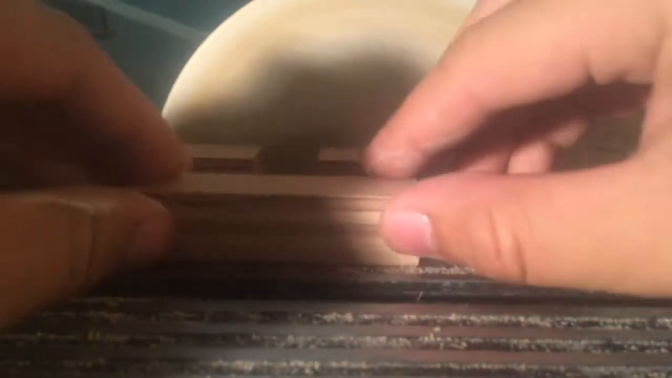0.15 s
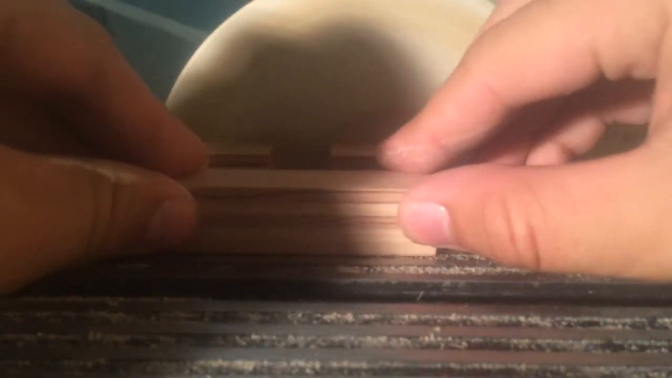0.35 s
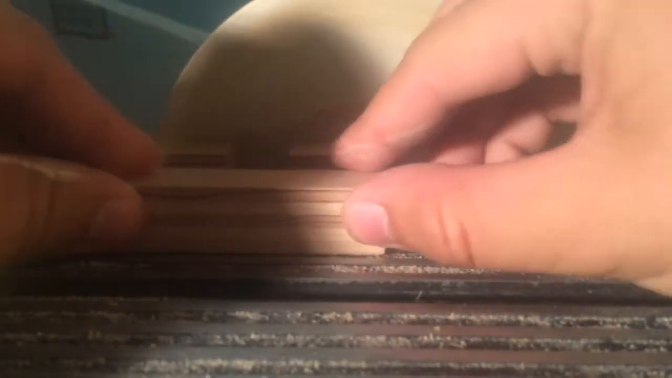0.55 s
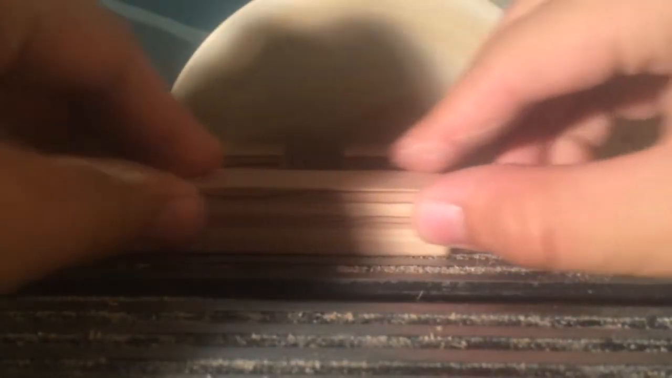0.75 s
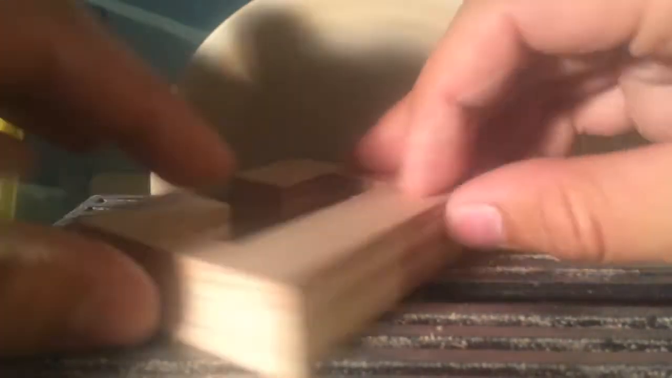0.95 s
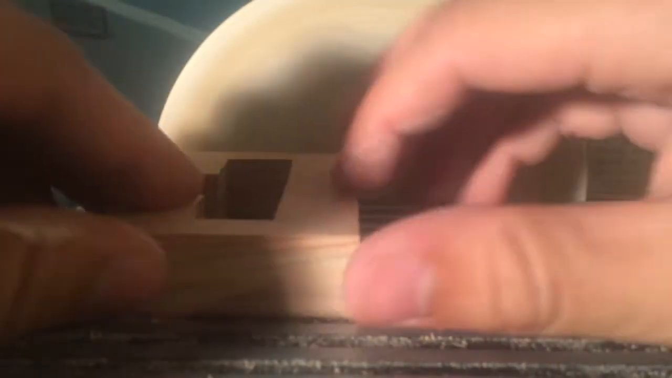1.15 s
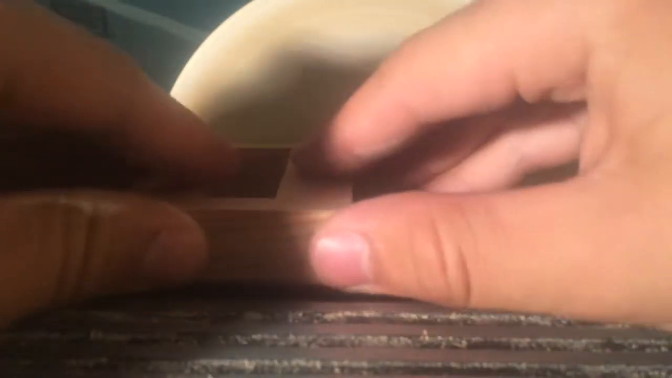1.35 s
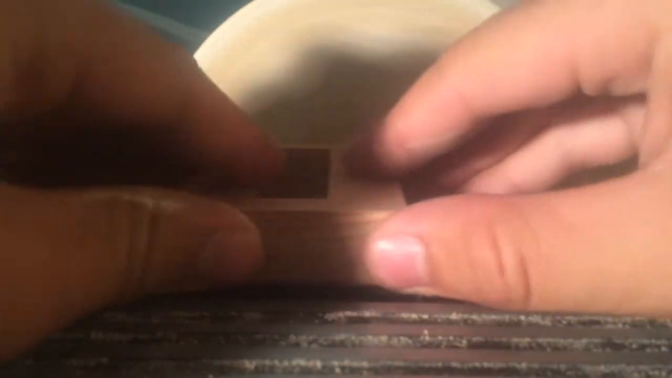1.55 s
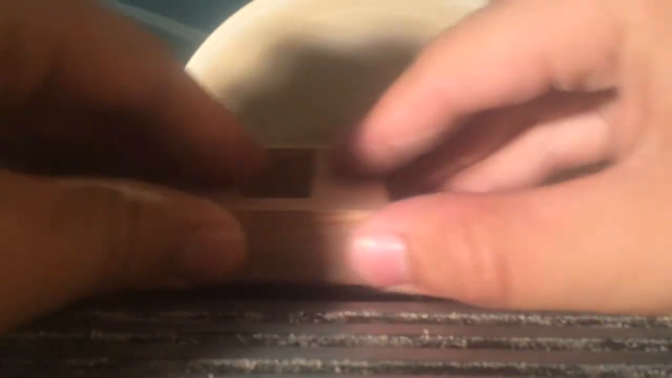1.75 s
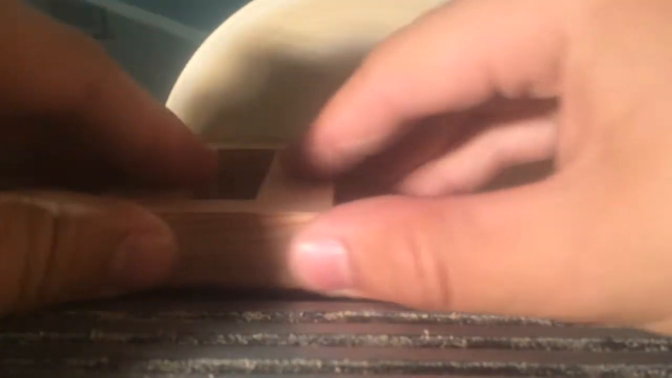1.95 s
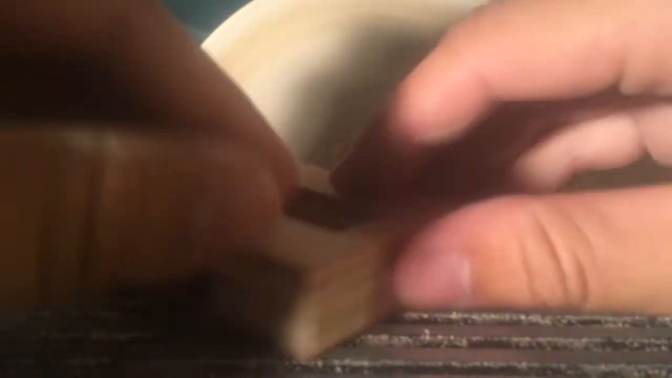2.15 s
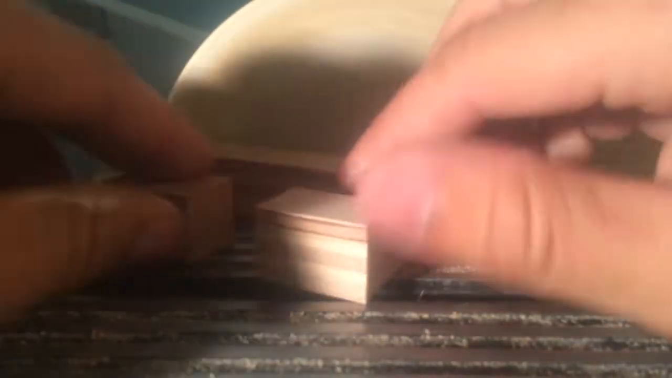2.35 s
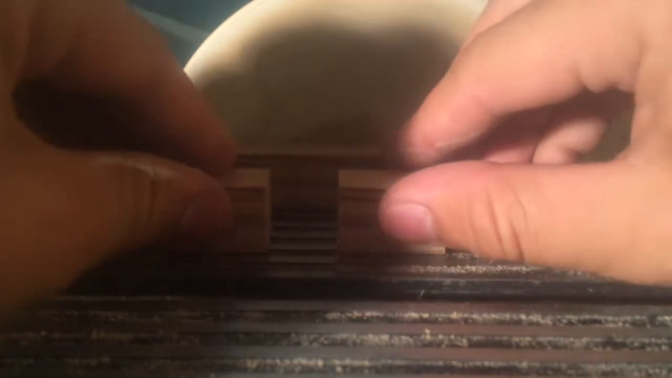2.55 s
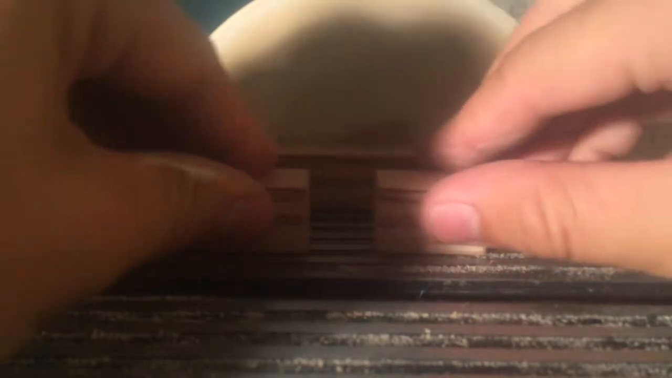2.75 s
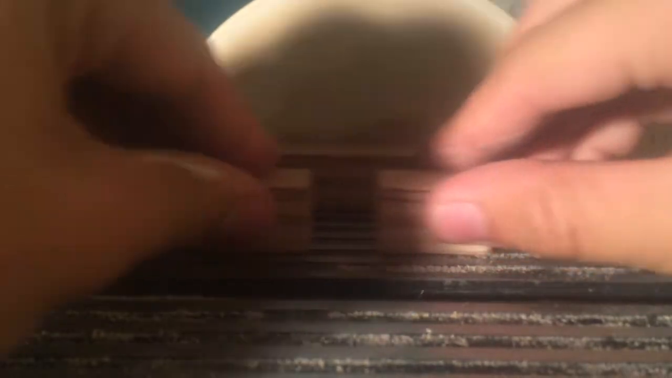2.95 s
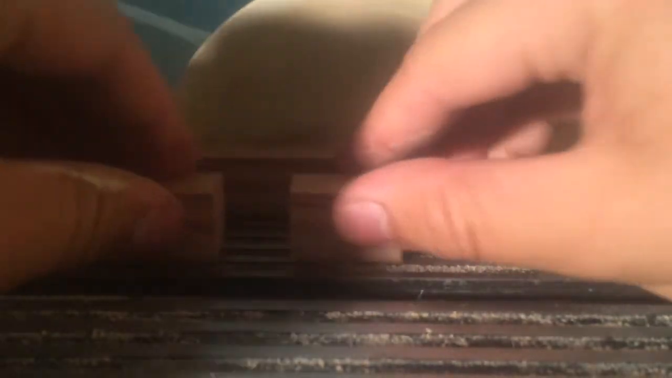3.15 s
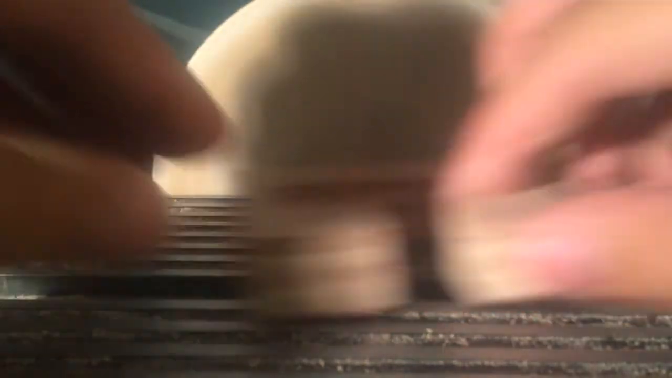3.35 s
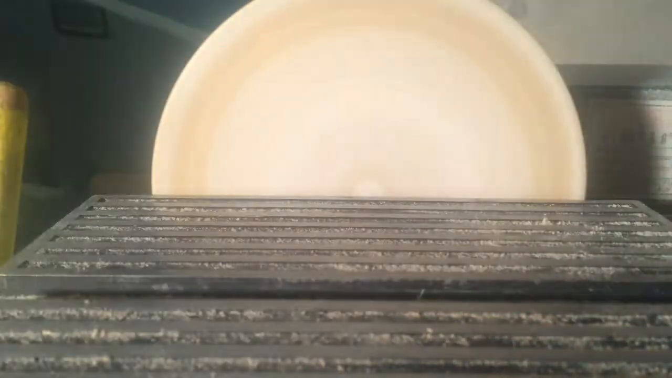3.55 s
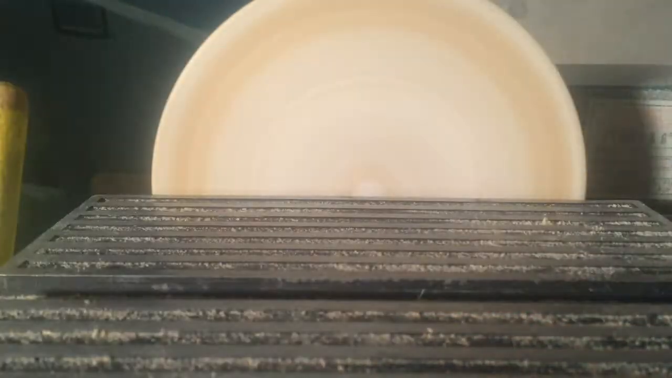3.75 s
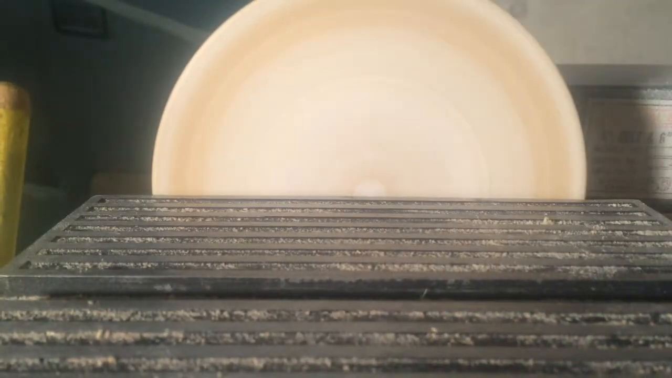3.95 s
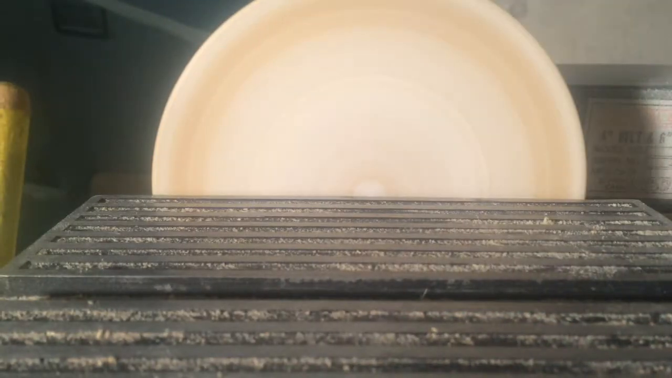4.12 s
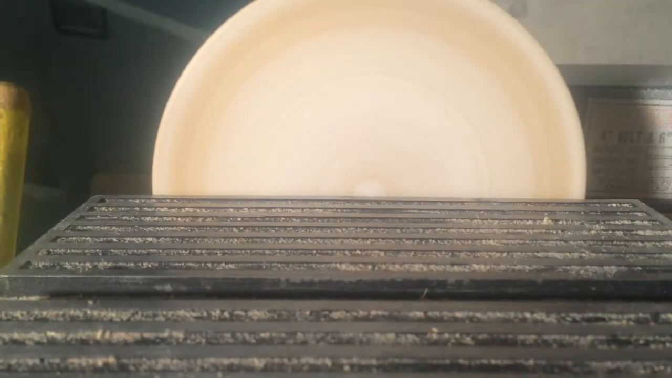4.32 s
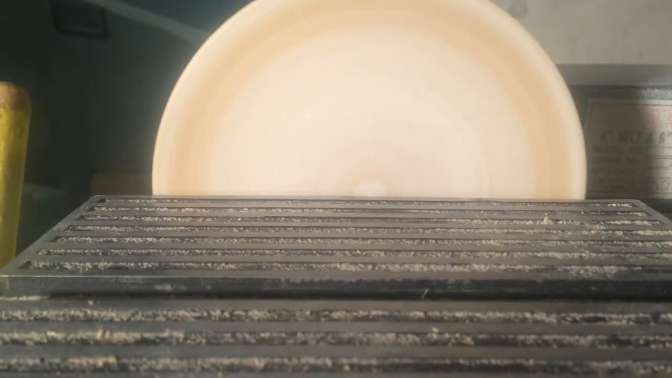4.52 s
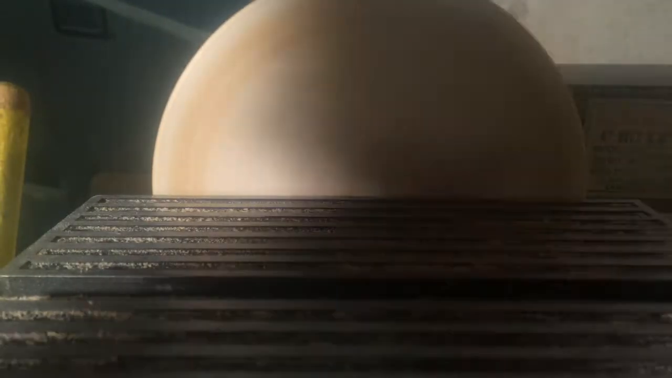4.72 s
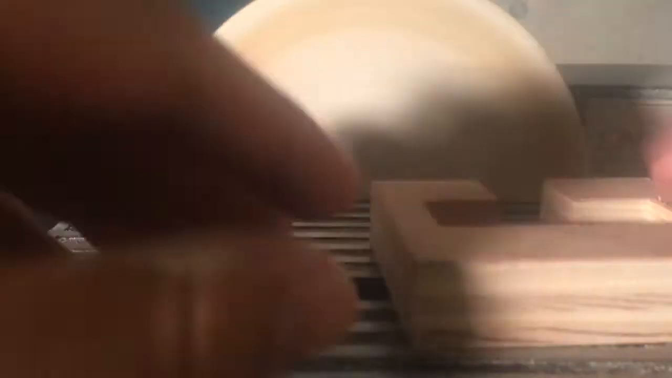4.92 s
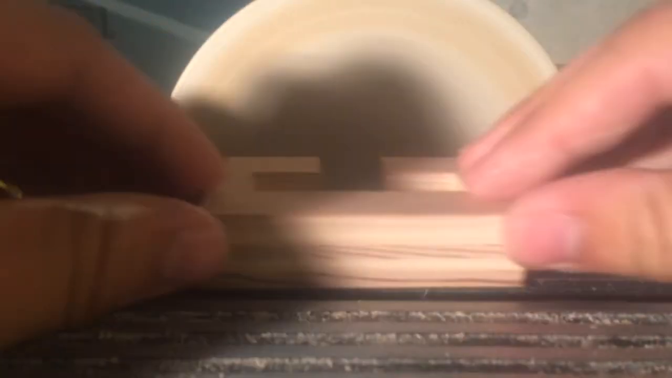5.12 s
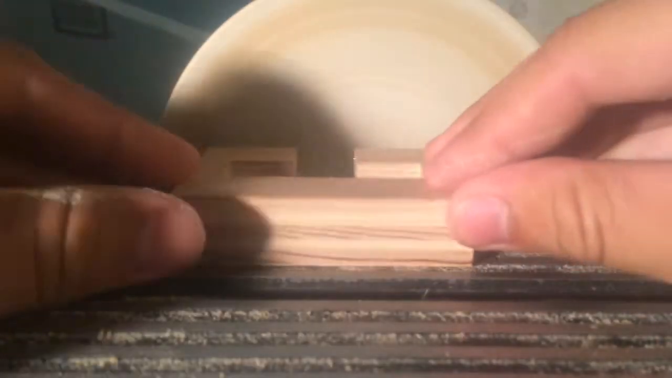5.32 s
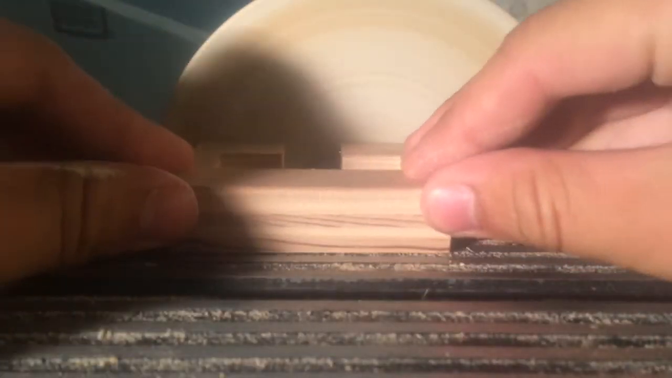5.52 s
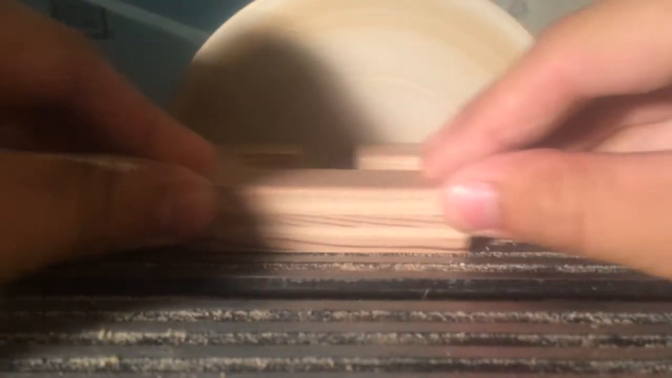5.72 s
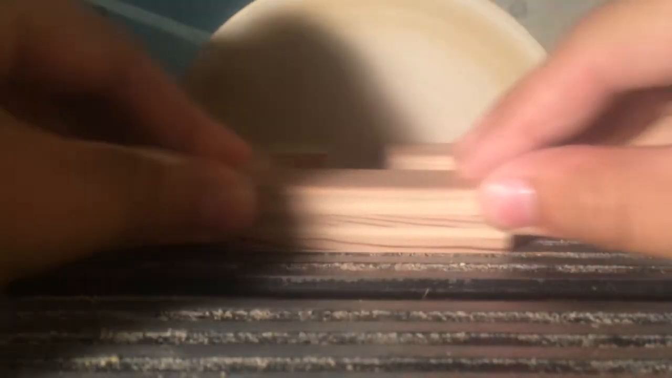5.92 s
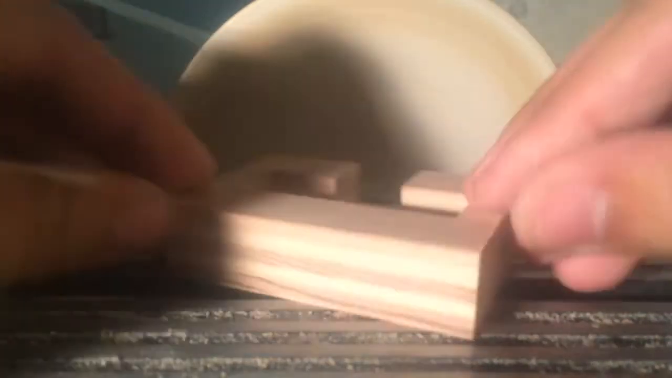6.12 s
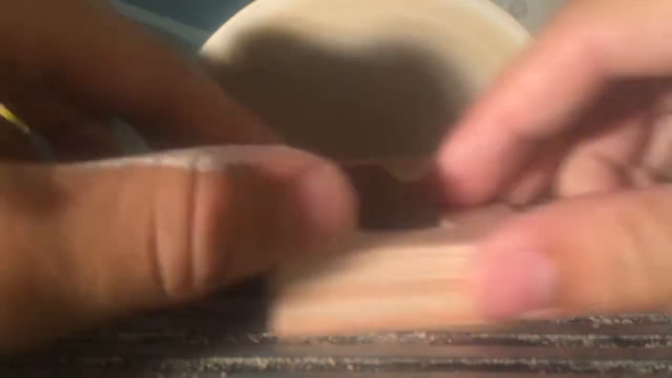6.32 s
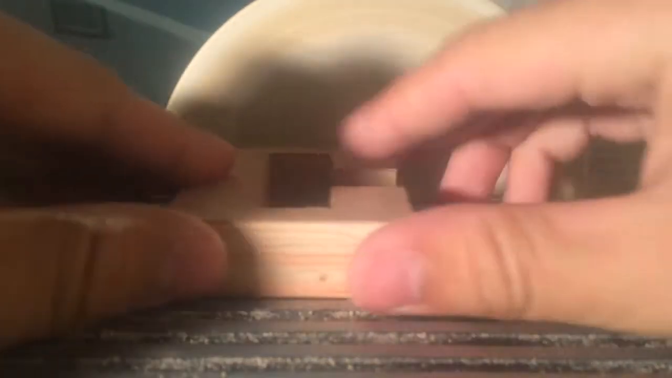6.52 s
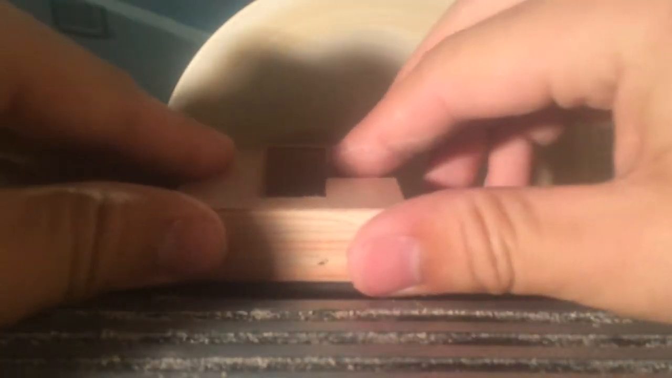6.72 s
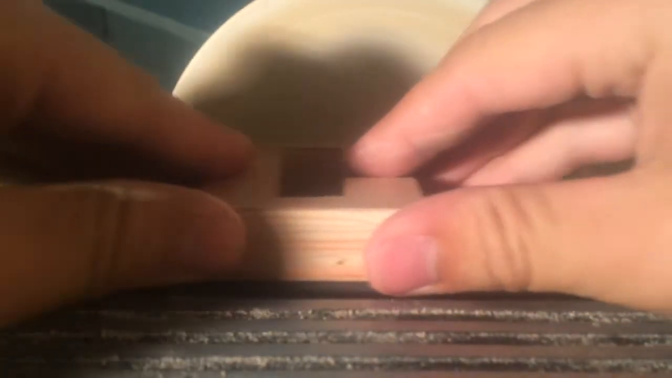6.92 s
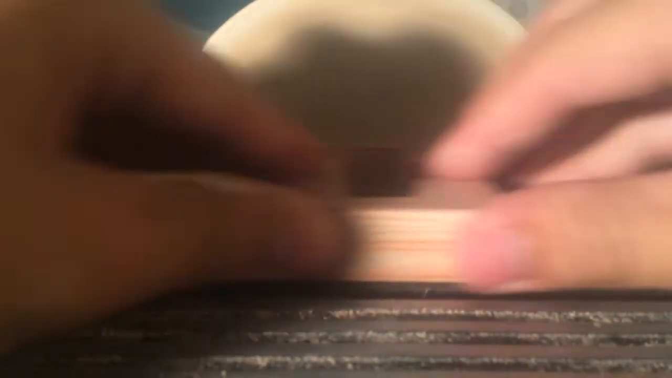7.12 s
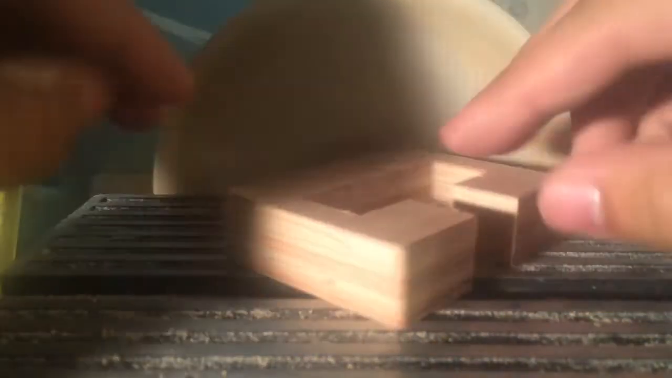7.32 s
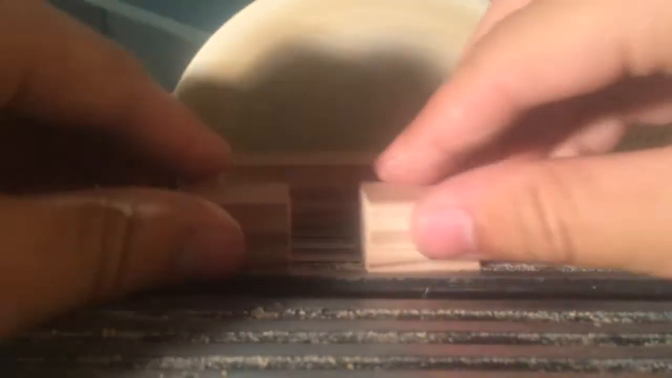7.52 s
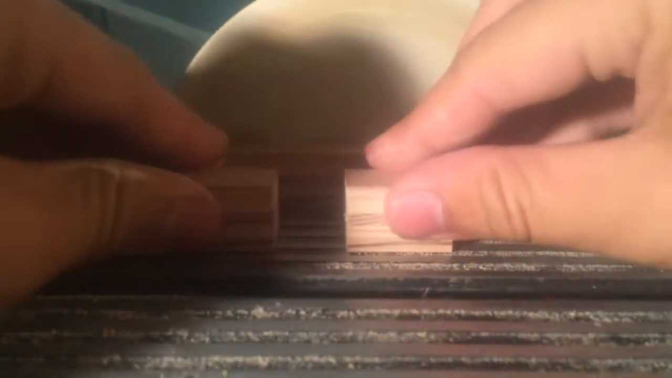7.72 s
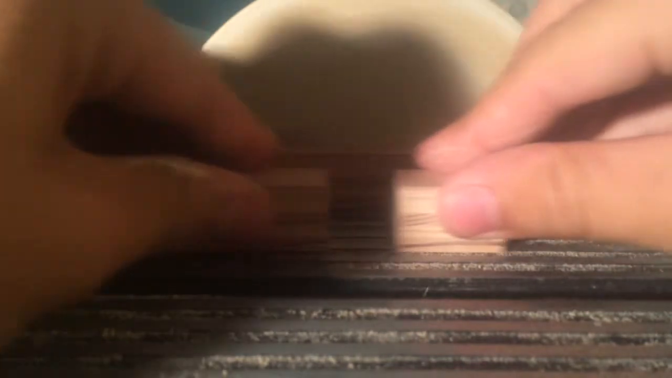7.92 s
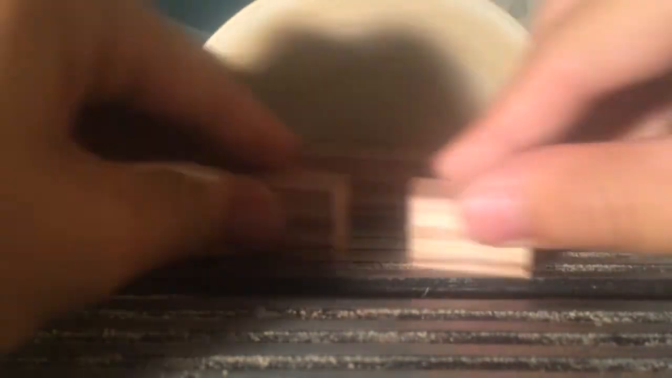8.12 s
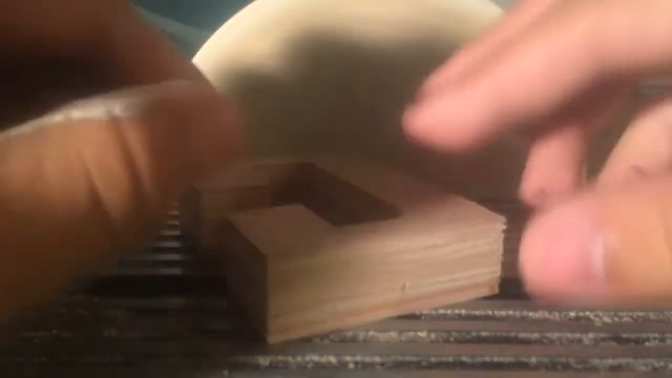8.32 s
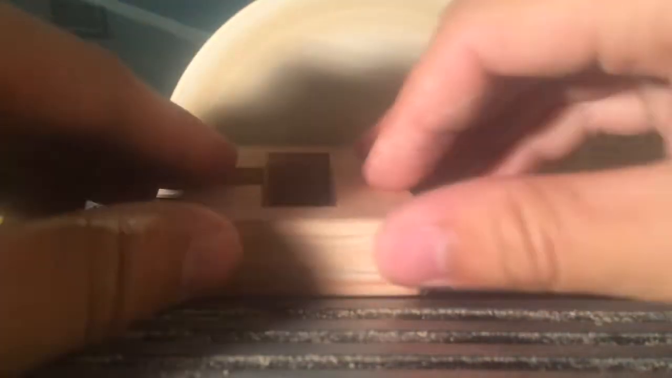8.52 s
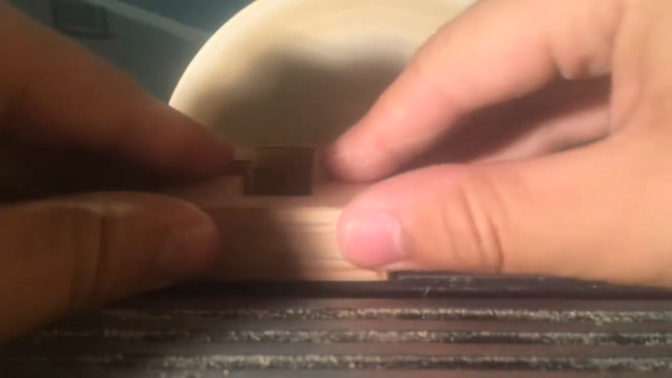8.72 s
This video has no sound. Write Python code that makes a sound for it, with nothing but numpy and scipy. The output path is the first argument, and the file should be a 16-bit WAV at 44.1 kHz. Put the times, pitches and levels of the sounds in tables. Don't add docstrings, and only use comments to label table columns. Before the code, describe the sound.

A disc sander whirs and hisses steadily while a small wooden block is pressed to it in short raspy strokes, with loose ticking and wood knocks.

```python
import sys
import numpy as np
from scipy import signal
from scipy.fft import rfft, irfft, next_fast_len
from scipy.io import wavfile
from scipy.ndimage import uniform_filter1d, minimum_filter1d

SR = 44100
rng = np.random.default_rng(int(sys.argv[2]) if len(sys.argv) > 2 else 0)


def rack_gain(trim_db):
    fader = np.asarray(trim_db, float)
    return 10 ** (fader / 20)


def inscribe(sig):
    pcm = np.round(np.clip(np.atleast_2d(sig).T, -1, 1) * 32767)
    wavfile.write(sys.argv[1], SR, pcm.astype(np.int16))


N = 386316
T = np.arange(N) / SR

CHANGE_S, FADE_OUT_S, FADE_IN_S = 3.882, .018, .035

HUM_HZ = [119, 177.4, 240, 300, 480, 538.5, 660.5, 720, 858, 901]
HUM_DB = [-81, -73, -58.5, -76, -69, -68.5, -69, -84, -76.5, -75]
# spectrum (frequency [Hz], density [dB per Hz]),
# housing rings (frequency [Hz], width [Hz], level [dB]), whole level [dB]
CLEAR_WHIR = [(24, -104), (40, -39), (239, -14.5), (397, -16), (1310, -13), (1590, -22.5), (1900, -16),
              (2650, -12), (4110, -13.5), (4800, -14.5), (5860, -5.5), (7800, -4), (10100, -41),
              (17200, -120)], [(1098, 12, -4), (1300, 100, -7), (1346, 20, -6), (1900, 210, -7.5),
              (2290, 32, -5.5), (2850, 37, -10), (3030, 130, -12.5), (3666, 46, -6), (4090, 115, -1.5),
              (5510, 78, -7.5), (5820, 320, -4), (6630, 42, 0), (7475, 72, 1), (8040, 51, -17)], -42
COVERED_WHIR = [(24, -76), (40, -46), (239, -11), (291, -15), (540, -10), (786, -18.5), (1340, -3),
                (1560, -11), (1860, -4.5), (3370, -7.5), (4020, -13), (7800, -6), (10100, -47),
                (17200, -120)], [(1092, 28, 5.5), (1348, 45, -1), (1906, 140, -1), (2770, 40, -5.5),
                (2986, 34, -7.5), (3660, 45, -2.5), (4085, 130, -2), (5450, 16, -0.5), (5950, 350, -5.5),
                (6580, 102, -1.5), (7630, 56, 1), (7770, 52, -2.5), (8300, 41, -20)], -42
# (time [s], covered share [0-1])
HANDS = [(0, 0.4), (1, 0.9), (2.4, 0.2), (3.25, 0.3), (3.6, 0.08), (4.7, 0), (5, 0.68), (6.4, 0.93),
         (7.5, 1), (8.76, 0.6)]
# (frequency [Hz], density [dB per Hz])
AIR = [(5000, -28), (8500, -2), (9450, -8.5), (10900, -13), (11300, -15), (15000, -20), (16000, -27)]

SHAFT_HZ, SHAFT_SAG_HZ, SHAFT_START = 59.48, .51, (.491, .381)
CAGE_HZ, CAGE_SAG_HZ, CAGE_START = 21.91, .42, (-.08, .32)
HIGH_SPOT_TURNS = .55

# (frequency [Hz], level [dB], t60 [s])
LOOSE_MODES = [(1923, -9, 0.022), (2142, 2.5, 0.012), (2300, -4, 0.011)]
# (time [s], peak of its best strike [dB], best cage angle [turns])
RATTLE = [(0, -46, 0.0033), (.8, -36, -0.028), (1, -34.5, -0.039), (1.4, -29, 0.021), (1.8, -40, -0.0027),
          (2.2, -47, -0.017), (4.75, -56, 0.002), (4.95, -39, 0.0056), (5.6, -29, .01), (6, -29.5, -0.034),
          (6.25, -33, -0.065), (6.6, -27.5, -0.0405), (7.1, -29.5, -0.0028), (7.6, -33.5, 0.037),
          (7.9, -28, 0.025), (8.2, -30.5, -0.066), (8.76, -27.5, -0.085)]
# (time [s], peak [dB])
STRAYS = [(0.16, -40), (0.1895, -36), (0.2573, -33), (0.2788, -35), (0.9033, -39), (0.9177, -37),
          (0.9521, -38), (0.9671, -33), (1.0185, -35), (1.0858, -34), (1.1023, -33), (1.1347, -38),
          (1.2225, -34), (1.2425, -35), (1.2869, -34), (1.3393, -32), (5.0162, -40), (5.0851, -28),
          (5.131, -38), (5.1719, -36), (5.2068, -39), (5.2203, -36), (5.2687, -35), (5.336, -35),
          (5.356, -35), (5.4043, -30), (5.4911, -38), (5.5355, -34),
          (6.096, -41), (6.1634, -38), (6.1828, -34), (6.2312, -25), (6.2657, -37), (6.2804, -38),
               (6.318, -37), (6.3669, -30), (6.3834, -36), (6.4153, -32), (6.5026, -31), (6.5515, -26),
               (6.5999, -29), (6.6189, -33), (6.6677, -34), (6.6867, -31), (6.7356, -32), (7.2433, -37),
               (7.2632, -38), (7.2932, -35), (7.3121, -34), (7.3445, -36), (7.38, -36), (7.4289, -34),
               (7.4812, -33), (7.5685, -35), (7.6134, -31), (7.6653, -35), (7.6848, -35), (7.6997, -34),
               (8.1208, -37), (8.1732, -42), (8.2071, -40), (8.256, -33), (8.3094, -33), (8.3922, -32),
               (8.4406, -30), (8.4934, -34), (8.5757, -31), (8.6246, -35), (8.7119, -36)]
AIM_TURNS, MISS_DB = .09, 4.5
FAR_SIDE_TURNS, FAR_SIDE_DB = .43, -8
LEAD_S, SWING_S, FAINT_DB = .0015, .015, -57
STRAY_DB, STRAY_SPREAD, YIELD_S = -38, 1.12, .05

# (time [s], pressure [dB], firmness of the grip [dB])
FIRST_STROKES = [
    [(0.266, -50, 1), (0.278, -32, -12), (0.296, -30, -8), (0.31, -22, 3), (0.42, -23.5, 3),
     (0.589, -20.5, -0.5), (0.73, -27, -1.5), (0.798, -31, -2), (0.848, -48, -11)],
    [(1.386, -22, 6), (1.4, -30, 0.5), (1.447, -27, -1.7), (1.6, -31, 1), (1.71, -21, 8), (1.77, -28.5, -1),
     (1.83, -33.5, -3), (1.962, -27, 1.1), (1.998, -40, 7)],
    [(2.58, -37, 9), (2.59, -25.5, 7.5), (2.66, -25, 0), (2.9, -22.5, 3.5), (2.93, -27, -3.5),
     (3.087, -25, -0.2), (3.151, -26, -2), (3.18, -38, -6)],
]
# (time [s], pressure [dB], firmness of the grip [dB])
SECOND_STROKES = [
    [(5.56, -30, -3), (5.69, -28.5, -1.5), (5.78, -32.5, 3), (5.8, -21.5, 1.1), (5.887, -20, 1.8),
     (5.95, -27.5, 0), (6.002, -18.5, 5), (6.045, -30.5, -3.4), (6.075, -50, -13)],
    [(6.693, -27.5, 13), (6.813, -23, 2), (6.87, -26, -6.1), (7.0, -23, 2), (7.02, -37, -4),
     (7.046, -22.5, 5), (7.09, -28, 8), (7.168, -28, -2), (7.24, -52, -17)],
    [(7.717, -27.5, 2.5), (7.778, -29, -0.5), (7.84, -23, -3), (7.972, -24, 2.1), (8.04, -27, 2),
     (8.08, -25, 3), (8.118, -38, -3), (8.145, -34, -8), (8.162, -43, -2.3)],
    [(8.655, -52, 2.3), (8.666, -28.5, -0.5), (8.71, -40, 0), (8.76, -39.5, 2)],
]
# (frequency [Hz], width [Hz], level [dB])
FIRST_RINGS = [
    [(2740, 65, -3.5), (4590, 81, -10), (6160, 49, 2.5), (9370, 290, 0), (10300, 51, -12), (10800, 59, -23),
     (7900, 100, -10)],
    [(2820, 150, -7), (4600, 170, -0.5), (5500, 200, -9.5), (6260, 260, -7), (8170, 36, -9),
     (10040, 74, -11), (10600, 110, -13), (8900, 60, -9), (12400, 99, -20)],
    [(1350, 22, -9.5), (2790, 11, -2.5), (4530, 37, -14), (5600, 97, -23), (6220, 58, -2), (7960, 220, 3),
     (8960, 200, -6), (10140, 45, -9)],
]
# (frequency [Hz], width [Hz], level [dB])
SECOND_RINGS = [
    [(2770, 220, -20), (4550, 160, -4.5), (4860, 140, -2.5), (5240, 49, -9), (6280, 130, -4),
     (8020, 360, -4.5), (9380, 800, -3), (9500, 150, -4), (10350, 110, -10)],
    [(4650, 170, -4.5), (5500, 540, -10.5), (6120, 130, 3), (8020, 190, -4), (10550, 60, -9),
     (10200, 100, -7), (10900, 73, -4.5)],
    [(1300, 110, -8.5), (2730, 72, -8), (4670, 180, -10), (6220, 230, -4.5), (7920, 200, 3.5),
     (8870, 61, -5), (10500, 220, -14), (10400, 67, -22)],
    [(4530, 150, 0), (6360, 53, 3), (8850, 47, -6), (10100, 36, -15)],
]
# (grit hiss [dB], disc ring [dB], block ring [dB], table ring [dB], throb per turn [0-1])
FACES = [(-1.5, -19, -11, -16, 0.1), (-4.5, -10.5, -5.5, -13, 0.05), (-3, -10.5, -14, -15, 0.4),
         (-2, -9.5, -12.5, -15.5, 0.1), (-4, -7, -8.5, -19, 0.66), (-2.5, -8, -12, -13, 0.75),
         (-4, -9, -8.5, -12, .45)]
PART_EDGES_HZ = [7000, 5400, 3750]
GRIP_SHARE = [0.15, 0.28, -0.78, -0.88]
# (frequency [Hz], density [dB per Hz])
GRIT = [(130, -60), (450, -32), (880, -22.5), (1500, -16), (1920, -13.5), (2440, -11), (2800, -7),
        (3840, -13), (6240, -4.5), (7030, -5.5), (10300, -6.5), (16000, -21.5)]
# (time [s], half length [s], ring [Hz], extra level [dB], shift [Hz])
SWELLS = [(.38, .04, 9370, -1, -200), (.51, .06, 9370, 2, 120), (.78, .05, 9370, -2, -250),
          (.57, .05, 6160, 4, 0), (.55, .04, 2740, 5, 0), (.59, .05, 4590, 4, 250), (1.47, .05, 6260, 3, 0),
          (1.7, .05, 6260, 4, 100), (1.7, .05, 5500, 4, 100), (1.9, .05, 6260, 3, -80),
          (1.73, .04, 10600, 4, 0), (1.79, .04, 4600, -4, 0), (2.79, .05, 2790, -4, 0),
          (2.97, .1, 2790, 4, 0), (3.14, .03, 2790, 4, 0), (2.82, .05, 6220, 3, 150),
          (3.08, .06, 6220, 3, 100), (2.86, .06, 7960, 2, 0), (5.85, .03, 4860, 4, 0),
          (5.66, .1, 4860, -6, 0), (5.92, .03, 8020, 3, 0), (5.58, .03, 6280, 4, 150),
          (6.01, .03, 2770, 10, 0), (6.78, .08, 6120, 4, 60), (6.91, .05, 6120, -6, 0),
          (7, .03, 6120, 4, 0), (6.74, .06, 4650, -8, 0), (6.92, .09, 4650, 3, 0), (7.08, .05, 4650, -5, 0),
          (7.16, .03, 4650, 3, 0), (6.96, .05, 8020, 6, 120), (6.84, .03, 8020, 4, 150),
          (7.1, .05, 8020, -4, 0), (7.05, .03, 10900, 5, 50), (6.84, .04, 5500, 4, 0),
          (8.07, .02, 10500, 9, 0), (8.08, .04, 7920, -4, 0), (7.95, .06, 6220, 2, 0),
          (7.99, .03, 7920, 3, 60)]
# (frequency [Hz], width [Hz], depth [0-1])
DEAD = [(9700, 110, .6), (12900, 200, .6)]
# (time [s], extra level [dB])
CATCHES = [(.729, 1), (1.464, -3), (1.653, 1), (1.856, 6), (1.908, 1), (2.585, 4), (2.602, 0), (5.567, 4),
           (5.602, 4), (5.734, 8), (5.764, 9), (5.846, 3), (5.992, 3), (6.036, 14), (7.139, 3), (7.168, 3),
           (7.825, 4), (7.877, 3), (7.998, 4), (8.665, 0.5)]
RING_BLUR_HZ, RING_Q = 80, 81

# (time [s], peak [dB], low part re peak [dB], t60 [s], brightness [dB], hollow ring re peak [dB])
KNOCKS = [(4.0194, -40, -25, .03, 0, -30), (4.194, -21, -23, 0.038, 3, -26),
          (4.5424, -32, -35, .03, -8, -28), (4.869, -29, -32, 0.07, 3, -25),
          (4.8725, -30, -40, .03, 0, -25), (4.8795, -28, -19, .018, -14, -25),
          (4.888, -27, -47, 0.06, 3, -22), (4.8897, -23, -47, .014, 12, -40)]
# (frequency [Hz], width [Hz], level [dB])
BLOCK_MODES = [(2530, 680, -7), (3400, 450, 5.5), (4600, 360, -2), (7800, 780, 7.5), (9700, 4300, -6)]
# (time [s], frequency [Hz], peak [dB], t60 [s])
SET_DOWN = [(4.872, 2700, -33, .03), (4.872, 4800, -34, .04), (4.8725, 11500, -38, .012),
            (4.8792, 2650, -23, .013), (4.88, 4400, -27, .012), (4.8885, 4880, -33, .12),
            (4.889, 8240, -28, .022), (4.8955, 7800, -31, .03), (4.89, 15300, -52, .06),
            (4.888, 2700, -38, .08), (4.905, 4450, -38, .08)]
# (time [s], rms level [dB], frequency [Hz], width [Hz], length [s])
THUMPS = [(3.65, -45, 3600, 900, 0.028), (3.978, -59, 120, 45, 0.061), (8.185, -56, 9800, 1800, 0.11),
          (3.2, -43, 3700, 1600, 0.013), (5.977, -53, 141, 80, .06), (5.975, -45.5, 700, 130, 0.056)]

KNEE_DB, DUCK_SHARE = -40, 0.48
SENSE_S, DUCK_S, HOLD_S, RECOVER_S = .012, .036, .03, 0.085
GAIN_STEP = 88


def evened(x):
    return x / np.sqrt(np.mean(x ** 2) + 1e-20)


def curve(rows, t):
    s, *columns = np.transpose(rows)
    return [np.interp(t, s, c) for c in columns]


def add(mix, s, sound):
    part = mix[round(s * SR):][:len(sound)]
    part += sound[:len(part)]


def lowpass(x, hz, order):
    return signal.sosfiltfilt(signal.butter(order, hz, fs=SR, output="sos"), x)


def coloured(x, broad, rings, broad_db):
    size = next_fast_len(len(x))
    hz = np.fft.rfftfreq(size, 1 / SR)
    f, db = np.transpose(broad)
    power = rack_gain(np.interp(np.log(hz + 1), np.log(f + 1), db) + broad_db) ** 2
    for centre, width, peak_db in rings:
        power = power + rack_gain(peak_db) ** 2 / (1 + (2 * (hz - centre) / width) ** 2) ** 1.43
    return irfft(rfft(x, size) * np.sqrt(power), size)[:len(x)]


def drift(t, top_hz):
    coarse = np.arange(t[0], t[-1] + .01, .002)
    waves = 0
    for f in np.geomspace(top_hz / 20, top_hz, num=24):
        waves = waves + np.sin(2 * np.pi * (f * coarse + rng.random())) / f ** 0.096
    return np.interp(t, coarse, evened(waves))


def ring(hz, t60, rise):
    t = np.arange(round(.15 * SR)) / SR
    shape = (1 - np.exp(-t / rise)) ** 2 * rack_gain(-60 * t / t60)
    return shape / shape.max() * np.sin(2 * np.pi * hz * t)


def resonate(x, hz, width):
    turn = np.exp(2j * np.pi * np.cumsum(hz) / SR)
    r = np.exp(-1.5 * np.pi * width / SR)
    smooth = signal.lfilter([(1 - r) ** 2], [1, -2 * r, r * r], x / turn)
    return 2 * (turn * smooth).real


def patchy(x, db, bins, frames):
    z = signal.stft(x, nperseg=512)[2]
    field = rng.standard_normal(z.shape[::-1]).T
    field = uniform_filter1d(uniform_filter1d(field, bins, 0), frames, 1)
    return evened(signal.istft(z * rack_gain(db * evened(field)), nperseg=512)[1][:len(x)])


def turned(hz, sag_hz, start):
    loaded_s = 0
    for rows in FIRST_STROKES + SECOND_STROKES:
        loaded_s = loaded_s + np.clip(T - rows[0][0], 0, rows[-1][0] - rows[0][0])
    return hz * T - sag_hz * loaded_s + np.where(T < CHANGE_S, *start)


def hum():
    out = np.zeros(N)
    for hz, db in zip(HUM_HZ, HUM_DB):
        waver_db = 0.13 * (max(HUM_DB) - db + 11.5)
        level = rack_gain(db + waver_db * drift(T, 9))
        out += level * np.sqrt(2) * np.sin(2 * np.pi * (hz * T + rng.random()))
    return out


def whir():
    beat = 1 + 0.11 * np.cos(2 * np.pi * SHAFT_HZ * T) + 0.14 * np.cos(2 * np.pi * HUM_HZ[2] * T)
    rough_db = 0.58 * drift(T, 30) + 0.71 * np.minimum(rng.exponential(1, N), 4)
    drive = rng.standard_normal(N) * beat * rack_gain(rough_db)
    clear, covered = (rack_gain(db + 0.28) * evened(coloured(drive, broad, rings, broad_db=-6))
                      for broad, rings, db in (CLEAR_WHIR, COVERED_WHIR))
    cover = np.clip(curve(HANDS, T)[0], 0, 1)
    body = lowpass((1 - cover) * clear + cover * covered, 8100, 6)
    air = coloured(rng.standard_normal(N), AIR, [], broad_db=0)
    air = rack_gain(-61) * patchy(air, db=3.0, bins=8, frames=5)
    return np.std(body) * patchy(body, db=0.5, bins=4, frames=12) + air


def loose_part():
    shaft = turned(SHAFT_HZ, SHAFT_SAG_HZ, SHAFT_START) + LEAD_S * SHAFT_HZ
    at = np.flatnonzero(np.diff(np.floor(shaft)))
    size, late, luck = rng.random((len(at), 3)).T
    faint = rack_gain(FAINT_DB + 10.5 * size ** 2 + 8.3 * curve(HANDS, T[at])[0])

    best_db, aim = curve(RATTLE, T[at])
    cage = turned(CAGE_HZ, CAGE_SAG_HZ, CAGE_START)[at] + LEAD_S * CAGE_HZ - aim
    near, far = ((cage - side + .5) % 1 - .5 for side in (0, FAR_SIDE_TURNS))
    met = rack_gain(-MISS_DB * (near / AIM_TURNS) ** 2)
    met = met + rack_gain(FAR_SIDE_DB - MISS_DB * (far / AIM_TURNS) ** 2)
    swing = SWING_S * np.where(abs(near) < abs(far), near, far)

    times, peaks_db = np.transpose(STRAYS)
    met = met * (abs(T[at][:, None] - times).min(axis=1) > YIELD_S)
    stray = rack_gain(STRAY_DB + STRAY_SPREAD * (peaks_db - np.median(peaks_db) - 2))

    strike_s = np.r_[T[at] + .005 * late, T[at] - swing, times]
    peaks = np.r_[faint, met * rack_gain(best_db - 3.5 * luck), stray]
    at = np.clip(strike_s * SR, 0, N - 1).astype(int)
    out = np.zeros(N)
    share = rack_gain(1.3 * rng.standard_normal((len(at), len(LOOSE_MODES))))
    for (hz, db, t60), part in zip(LOOSE_MODES, share.T):
        blows = np.bincount(at, peaks * part, N)
        out += rack_gain(db) * signal.oaconvolve(blows, ring(hz, t60, .004))[:N]
    return out


def gripped_ring(grit, t, turn, throb, hz, width, db):
    angle = turn + 2.2 * rng.random()
    throb_db = throb * (5.1 * np.cos(angle) + 2.2 * np.cos(2 * angle + 0.7))
    push = rack_gain(throb_db + 1.3 * drift(t, 14))
    ring_hz = hz
    for s, half, centre, extra_db, shift_hz in SWELLS:
        if abs(centre / hz - 1) < .035 and t[0] < s < t[-1]:
            bump = np.exp(-((t - s) / half) ** 2)
            db = db + bump * extra_db
            ring_hz = ring_hz + bump * shift_hz
    width = width + RING_BLUR_HZ + np.mean(ring_hz) / RING_Q
    return rack_gain(db) * resonate(grit * evened(push), ring_hz * (1 + .004 * drift(t, 7)), width)


def stroke(rows, face, rings):
    t = np.arange(rows[0][0], rows[-1][0], 1 / SR)
    pressure_db, grip_db = curve(rows, t)
    *parts_db, throb = face
    throb = np.clip(throb, 0, 1)
    shaft = np.interp(t, T, turned(SHAFT_HZ, SHAFT_SAG_HZ, SHAFT_START))
    turn = 2 * np.pi * (shaft - HIGH_SPOT_TURNS) + .2 * rng.random() + .2 * drift(t, 10.0)

    grains_db = 3.1 * np.minimum(rng.exponential(1, len(t)), 4)
    grit = evened(rng.standard_normal(len(t)) * rack_gain(grains_db))
    pulse = evened(rack_gain(throb * 1.5 * np.cos(turn) + drift(t, 60) * 0.14))
    rasp = coloured(grit * pulse, GRIT, [], broad_db=0.0)
    for hz, width, db in rings:
        rasp += gripped_ring(grit, t, turn, throb, hz, width, db)
    rasp = patchy(rasp, db=1.8, bins=5, frames=12)
    rasp = patchy(rasp, db=1.4, bins=40, frames=2)
    for hz, width, depth in DEAD:
        rasp = rasp - np.clip(depth, 0, 1) * resonate(rasp, hz + 0 * t, width)

    lows = [lowpass(rasp, hz, 5) for hz in PART_EDGES_HZ]
    parts = [rasp - lows[0], lows[0] - lows[1], lows[1] - lows[2], lows[2]]
    rasp = 0
    for db, share, part in zip(parts_db, GRIP_SHARE, parts):
        rasp = rasp + rack_gain(pressure_db + db + share * grip_db) * evened(part)
    catch_db = sum(db * np.exp(-abs(t - s) / np.where(t < s, .0008, .004)) for s, db in CATCHES)
    touch = np.clip((t - t[0]) / 0.0063, 0, 1)
    lift = np.clip((t[-1] - t) / 0.0031, 0, 1)
    return t[0], rasp * rack_gain(catch_db) * touch * lift


def shop(x):
    t = np.arange(round(.25 * SR)) / SR
    t60 = 0.13
    tail = rng.standard_normal(len(t)) * rack_gain(-60 * t / t60) * (t > .003)
    return x + rack_gain(-13) * signal.oaconvolve(x, tail / np.linalg.norm(tail))[:N]


def knocks():
    out = np.zeros(N)
    t = np.arange(round(.08 * SR)) / SR
    for s, db, low_db, t60, bright_db, hollow_db in KNOCKS:
        crack_curve = [(300, -35), (1500, -16), (4000, -14), (9000, 1 + bright_db), (16000, -29 + 2 * bright_db)]
        crack = coloured(rng.standard_normal(len(t)), crack_curve, BLOCK_MODES, broad_db=-1)
        hollow_modes = [(4830, 100, 4.5), (4400, 140, -2), (2680, 160, 2)]
        hollow = coloured(rng.standard_normal(len(t)), [(300, -60), (16000, -60)], hollow_modes, broad_db=0)
        push = (ring(650, 0.045, 0.0016) + ring(870, 0.028, .002))[:len(t)]
        add(out, s, rack_gain(db - 9.5 - 60 * t / t60) * evened(crack) * np.clip(t / 0.00066, 0, 1))
        add(out, s, rack_gain(db + low_db) * push)
        add(out, s, rack_gain(db + hollow_db - 60 * t / 0.1) * evened(hollow))
    for s, hz, db, t60 in SET_DOWN:
        mode = ring(hz, t60, .0005)
        add(out, s, rack_gain(db + 2.5 * drift(T[:len(mode)], 500)) * mode)
    for s, db, hz, width, length in THUMPS:
        bump = resonate(rng.standard_normal(len(t)), hz + 0 * t, width)
        add(out, s, rack_gain(db) * evened(bump) * np.sin(np.pi * np.minimum(t / length, 1)) ** 2)
    return out


def scene():
    near = knocks()
    for rows, face, rings in zip(FIRST_STROKES + SECOND_STROKES, FACES, FIRST_RINGS + SECOND_RINGS):
        add(near, *stroke(rows, face, rings))
    return (hum() + whir() + loose_part() + shop(near))[None]


def gain(dry):
    power = abs(uniform_filter1d(dry[0] ** 2, int(SENSE_S * SR)))[::GAIN_STEP]
    level_db = 10 * np.log10(power + 1e-12)
    duck_db = DUCK_SHARE * np.maximum(level_db - KNEE_DB, 0)
    hold = int(HOLD_S * SR / GAIN_STEP) // 2
    duck_db = -minimum_filter1d(-duck_db, 2 * hold + 1, origin=hold)
    now_db = 0
    held_db = np.zeros(len(duck_db))
    for k, aim_db in enumerate(duck_db):
        pace_s = DUCK_S if aim_db > now_db else RECOVER_S
        now_db += (aim_db - now_db) * (1 - np.exp(-GAIN_STEP / SR / pace_s))
        held_db[k] = now_db
    return rack_gain(-np.interp(T, T[::GAIN_STEP], held_db))


def band_limit(x):
    return signal.sosfilt(signal.butter(12, 15840, fs=SR, output="sos"), x)


def record(dry):
    dip = np.maximum((CHANGE_S - T) / FADE_OUT_S, (T - CHANGE_S) / FADE_IN_S)
    heard = gain(dry) * dry * np.clip(dip, .03, 1)
    heard = .14 * np.tanh(heard / .14)
    heard = signal.sosfilt(signal.butter(2, 70, "high", fs=SR, output="sos"), heard)
    top = signal.firwin(1001, 15900, window=("kaiser", 8), fs=SR)
    heard = signal.oaconvolve(heard, top[None], "same")
    return band_limit(heard)


dry = scene()
out = record(dry)
inscribe(out)
```